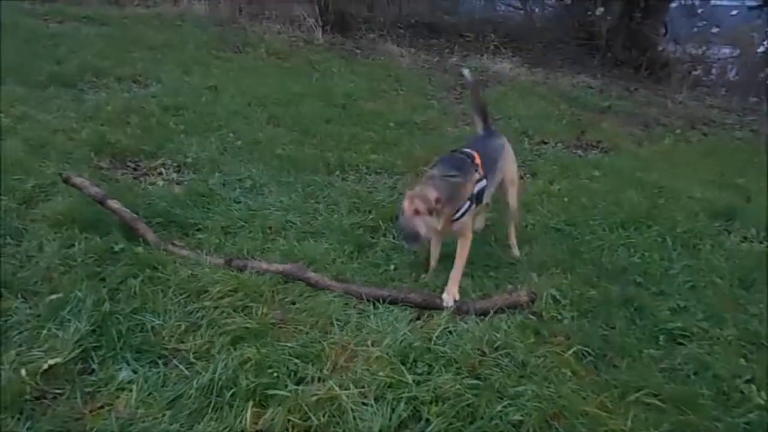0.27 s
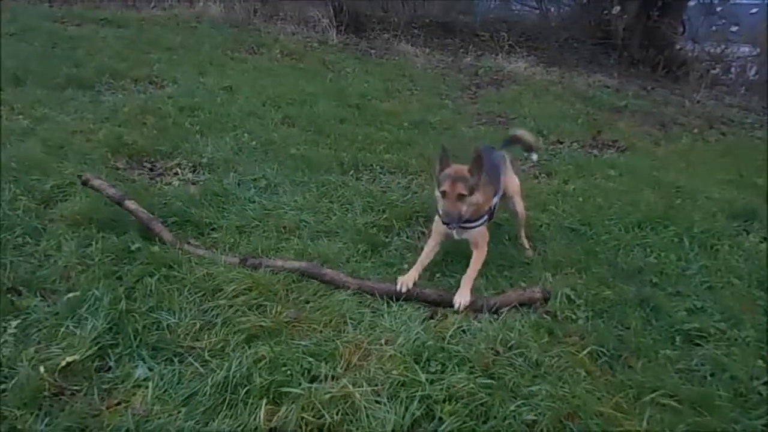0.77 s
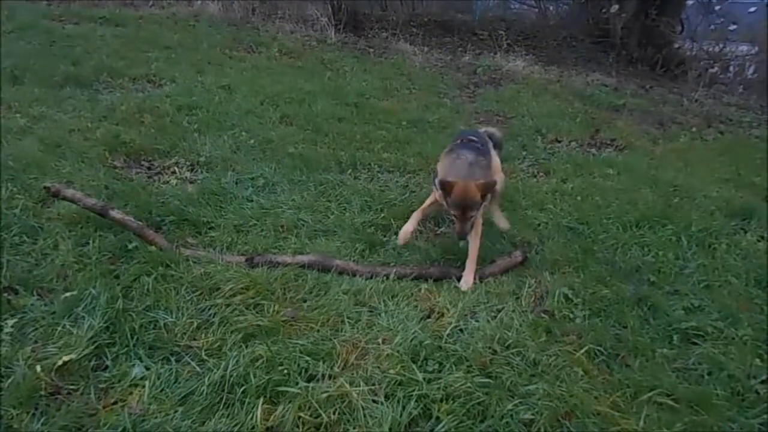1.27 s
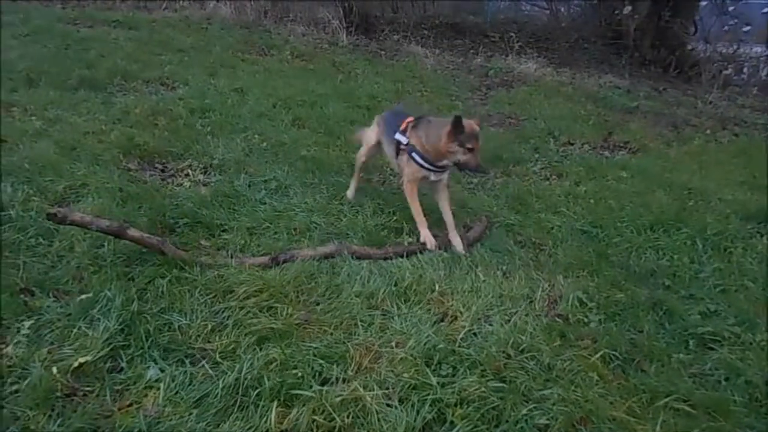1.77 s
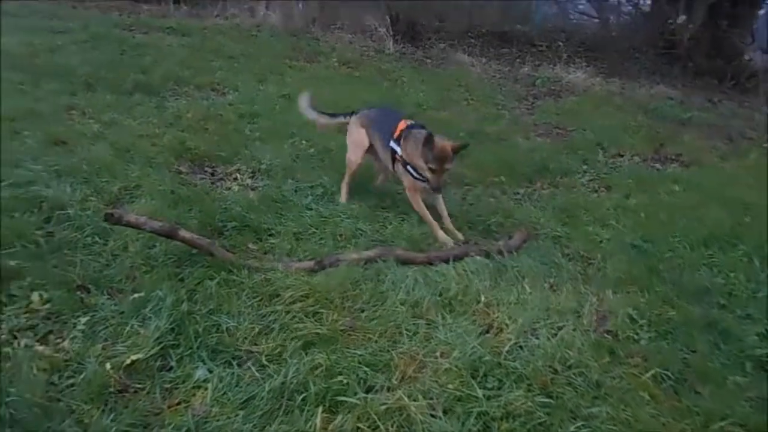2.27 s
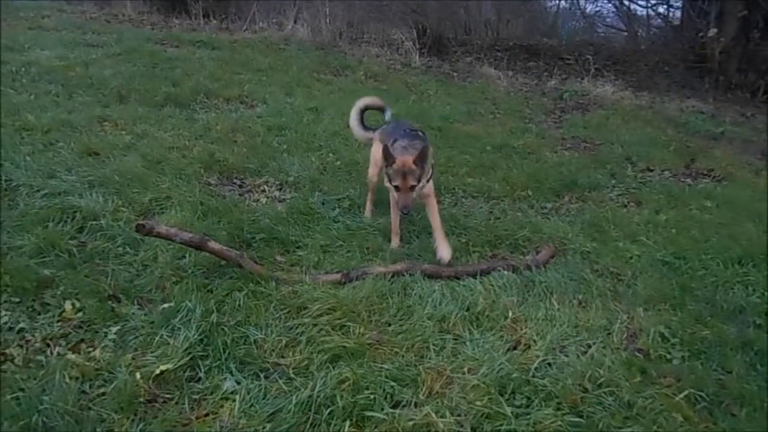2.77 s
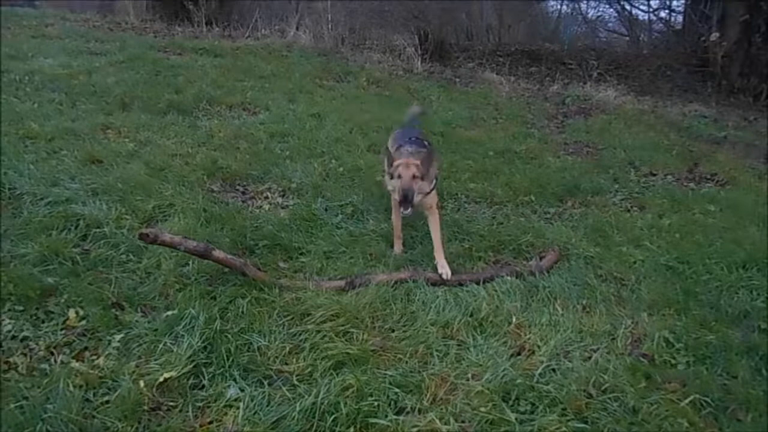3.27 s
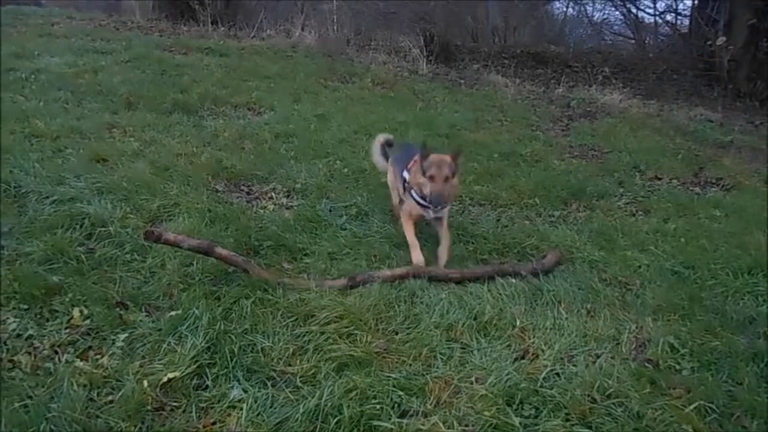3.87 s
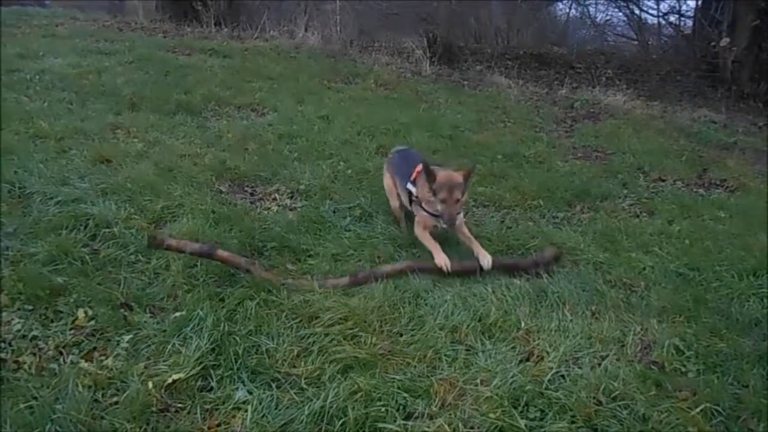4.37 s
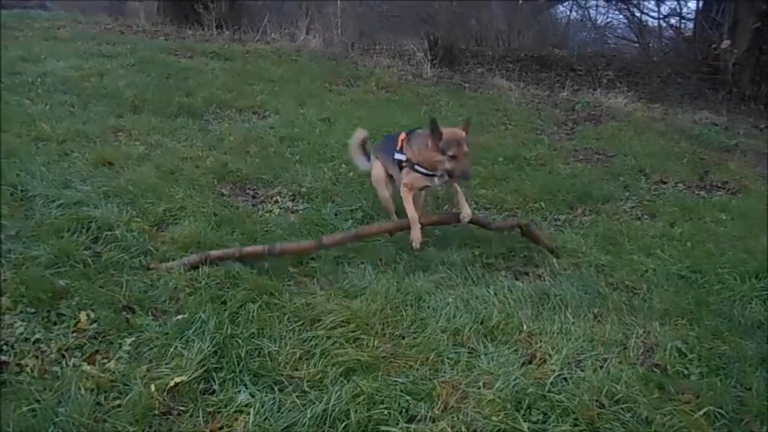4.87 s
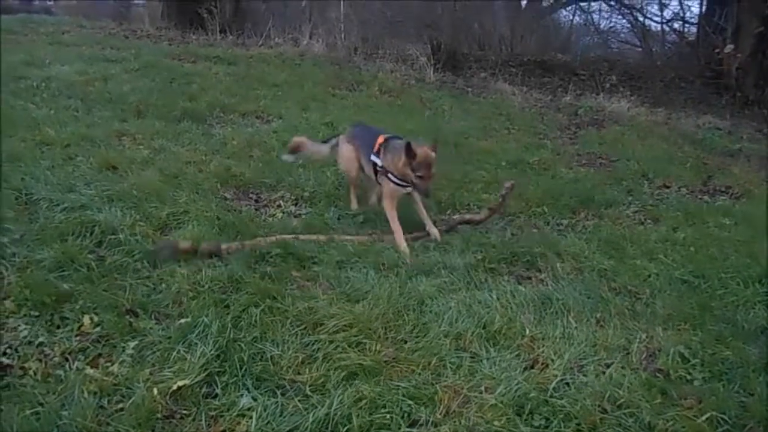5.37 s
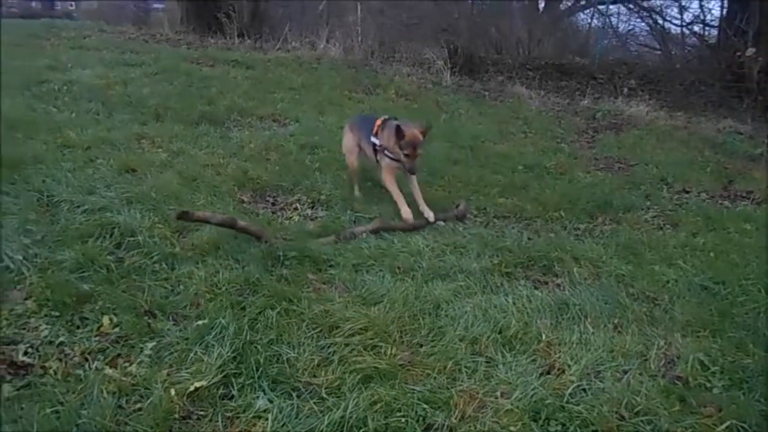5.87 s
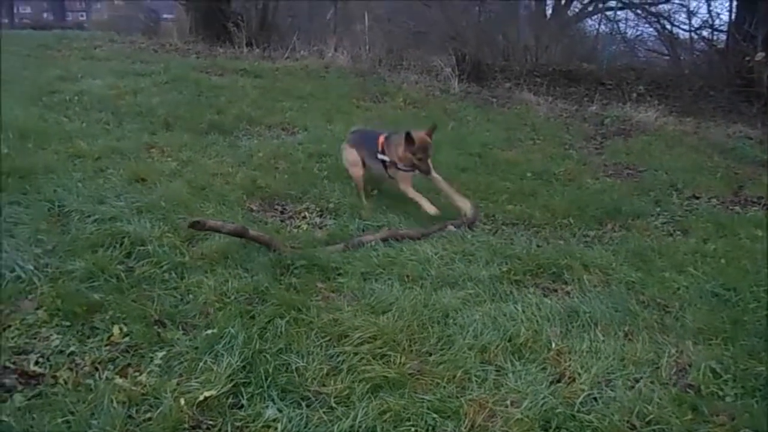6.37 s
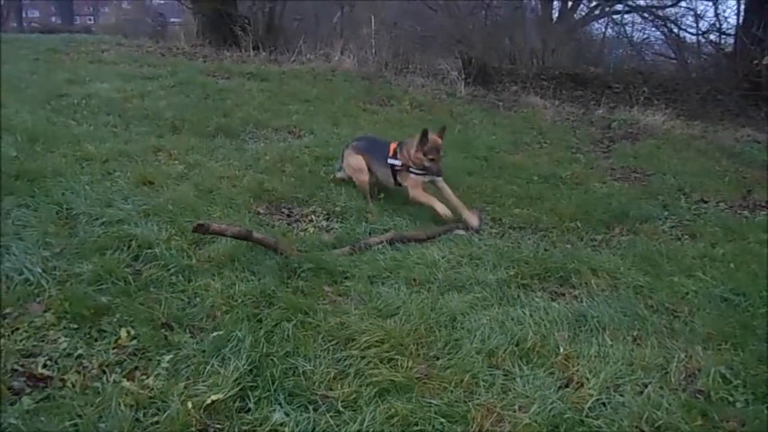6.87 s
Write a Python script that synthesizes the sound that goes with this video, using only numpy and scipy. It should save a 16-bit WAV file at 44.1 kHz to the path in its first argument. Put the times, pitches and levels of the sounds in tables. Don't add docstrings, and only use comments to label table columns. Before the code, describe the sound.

On an open grassy slope, a dog barks in a steady excited run, short and sharp, with crunchy overload on the loud peaks. Faint returns from hedge and trees follow each bark. In the gaps it paws a stick: soft thuds, woody clicks, small snaps and rustling grass, with heavier thumps later on. Far traffic hiss and brief low wind rumbles sit quietly beneath, caught by a small handheld camera.

```python
import sys
import numpy as np
from scipy import signal
from scipy.io import wavfile
from scipy.ndimage import uniform_filter1d

SR = 44100
rng = np.random.default_rng(int(sys.argv[2]) if len(sys.argv) > 2 else 0)


def amplitude_ratio(level_db):
    exponent = np.asarray(level_db, float) / 20
    return 10 ** exponent


def master_out(mix):
    frames = np.transpose(np.atleast_2d(mix))
    ceiling = np.clip(frames, -1, 1)
    pcm = np.round(ceiling * 32767).astype(np.int16)
    wavfile.write(sys.argv[1], SR, pcm)


N = 313992

# start, then lengths of swell, hoarse stage, clear stage and fade, all in [s].
BARKS = [(.182, .01, .037, .077, .025), (.788, .015, .049, .066, .032), (1.328, .022, .033, .059, .053),
         (1.795, .057, .058, .037, .048), (2.396, .025, .047, .06, .024), (3.226, .038, .041, .08, .025),
         (3.868, .037, .06, .045, .03), (4.386, .041, .031, .057, .04), (5.016, .047, .072, .023, .047),
         (5.617, .031, .034, .052, .05), (6.082, .036, .032, .045, .04), (6.612, .042, .048, .038, .045)]


def evened(x):
    return x / np.sqrt(np.mean(x ** 2) + 1e-20)


def read(points, hz):
    f, value = np.transpose(points)
    return np.interp(np.log(hz + 1), np.log(f + 1), value)


def add(mix, start_s, sound):
    part = mix[round(start_s * SR):][:len(sound)]
    part += sound[:len(part)]


def resonate(x, hz, width_hz):
    turn = np.exp(2j * np.pi * np.cumsum(hz * np.ones(len(x))) / SR)
    r = np.exp(-np.pi * width_hz / SR)
    return 2 * (turn * signal.lfilter([1 - r], [1, -r], x / turn)).real


def swells(events, rest_db):
    t = np.arange(N) / SR
    return amplitude_ratio(rest_db) + sum(amplitude_ratio(db) * np.exp(-((t - s) / half_s) ** 2) for s, half_s, db in events)


def traffic():
    # frequency [Hz], density [dB per Hz].
    road = [(20, -14.5), (60, -12.5), (369, -11.5), (880, -4.5), (1900, -7.5), (2880, -18), (8380, -36.5),
            (11000, -62.5)]
    level_db, patch_db = -46, 0.76
    frames, hz = N // 256 + 5, np.fft.rfftfreq(1024, 1 / SR)
    a, b, patches = rng.standard_normal((frames, 513, 3)).T
    patches = uniform_filter1d(patches, 12, 0)
    patches = evened(uniform_filter1d(patches, 16, 1))
    z = (a + 1j * b) * amplitude_ratio(read(road, hz)[:, None] + patch_db * patches)
    hiss = signal.istft(z, nperseg=1024, noverlap=768)[1][:N]
    return amplitude_ratio(level_db) * evened(hiss)


def wind():
    # middle [s], half length [s], level [dB].
    gusts = [(.01, 0.035, -38.5), (.16, .04, -52), (.76, .05, -51), (1.2, .15, -50.5), (1.73, .07, -45),
             (2.2, 0.088, -44), (3.1, 0.17, -61), (3.82, .1, -53), (4.97, 0.063, -47), (5.37, 0.084, -36.5),
             (6.05, 0.082, -45.5), (6.55, .12, -39), (6.96, 0.053, -31.5)]
    calm_db, buffet_db, buffet_s = -66.5, -44, 0.046
    lumps = amplitude_ratio(5.0 * evened(uniform_filter1d(rng.standard_normal(N), 1500)))
    band = signal.butter(2, [22, 110], "band", fs=SR, output="sos")
    low = signal.sosfilt(band, rng.standard_normal(N))
    buffets = [(sum(b), buffet_s, buffet_db) for b in BARKS]
    return swells(gusts + buffets, calm_db) * evened(low * lumps)


def knocks(events, cycles, noisy, t60_s, spread):
    out, t = np.zeros(N), np.arange(3000) / SR
    for (s, db, hz), puff in zip(events, rng.standard_normal((len(events), 3000))):
        swing = np.sin(2 * np.pi * hz * t) * np.exp(-hz * t / cycles)
        puff = resonate(puff, hz, spread * hz)
        puff = evened(resonate(puff, hz, spread * hz)) * amplitude_ratio(-60 * t / t60_s)
        onset = (1 - np.exp(-hz * t / 0.14)) ** 2
        add(out, s, amplitude_ratio(db) * (swing + noisy * puff) * onset)
    return out


def pawing():
    # time [s], peak [dB], pitch [Hz].
    thuds = [(0.017, -38, 216), (1.119, -44, 227), (1.227, -35, 144), (1.706, -35, 144), (1.749, -36, 143),
             (2.199, -43, 388), (2.998, -52, 452), (4.959, -33, 230), (5.315, -25.5, 143.7),
             (5.325, -28, 260), (5.347, -40, 289), (5.372, -22, 232), (5.388, -48, 307), (5.479, -39, 277),
             (5.896, -36.5, 218), (6.42, -35, 236), (6.455, -25.5, 168.6), (6.519, -27.5, 156),
             (6.573, -28, 250), (6.59, -26, 142), (6.94, -14.5, 171), (6.96, -28, 439), (6.979, -47.5, 186)]
    # time [s], peak [dB], pitch [Hz].
    ticks = [(0.5694, -51, 2800), (0.7257, -36, 3860), (1.272, -36, 3750), (1.6467, -37, 3650),
             (1.708, -32, 5170), (2.0453, -28, 3640), (2.2194, -55.5, 4410), (2.826, -40, 3600),
             (3.7192, -33, 3050), (3.8546, -19.5, 3800), (3.8734, -11.5, 4200), (4.1794, -46, 3880),
             (4.812, -42, 4390), (4.9611, -32, 4400), (5.4233, -46, 2710), (5.4794, -38, 7530),
             (6.4732, -29.5, 3300), (6.5904, -42, 4560)]
    # time [s], peak [dB], pitch [Hz].
    tag = [
        (6.254, -28, 3850),
    ]
    # time [s], peak [dB], pitch [Hz].
    snaps = [
        (1.272, -25, 1670),
        (1.536, -27, 900),
        (4.961, -43, 1780),
        (5.325, -30.5, 905),
        (5.424, -27, 714),
        (6.943, -41, 590),
    ]
    turf = knocks(thuds, cycles=1.0, noisy=0.68, t60_s=0.088, spread=1.07)
    turf = turf + knocks(ticks, cycles=1.5, noisy=.45, t60_s=.03, spread=.9)
    turf = turf + knocks(tag, cycles=19.0, noisy=0.07, t60_s=0.033, spread=.2)
    return turf + knocks(snaps, cycles=2.0, noisy=0.96, t60_s=0.031, spread=1.0)


def rustle():
    # middle [s], half length [s], level [dB].
    scuffs = [(.15, .05, -59), (.572, 0.013, -56), (.72, .1, -57), (1.27, .08, -55), (1.74, .08, -55.5),
              (2.045, 0.019, -57), (2.21, 0.015, -53), (2.35, 0.11, -57), (2.63, 0.023, -58),
              (3.0, 0.24, -67), (3.54, .015, -56), (3.76, 0.13, -48), (4.12, .015, -63), (4.33, .09, -55.5),
              (4.81, 0.013, -46), (4.9, 0.15, -59), (5.45, 0.082, -52.5), (5.59, 0.045, -51),
              (6.02, 0.099, -56.5), (6.475, .015, -50.5), (6.58, 0.062, -62.5), (6.97, .02, -64)]
    rest_db, after_db, after_s = -75.5, -48.5, .05
    snaps_per_s = 9000
    tufts = amplitude_ratio(1.5 * evened(uniform_filter1d(rng.standard_normal(N), 1500)))
    snaps = amplitude_ratio(2.0 * rng.exponential(1, N)) * rng.standard_normal(N)
    snaps = snaps * (rng.random(N) < snaps_per_s / SR)
    band = signal.butter(2, [2200, 6500], "band", fs=SR, output="sos")
    fizz = signal.sosfilt(band, snaps * tufts)
    after_barks = [(sum(b), after_s, after_db) for b in BARKS]
    return swells(scuffs + after_barks, rest_db) * evened(fizz)


def controls(stages, voice, mouth):
    peak_db, high, locked, last, clear = voice
    jaw, jaw_clear, mouth_db, clear_db = mouth
    start_db, murmur_db, voiced_db, open_db = -44, -24.5, -13.5, -9
    release_db, midfade_db, drop_db, end_db = -7, -10, -21, -33
    murmur, hold, midfade = .52, .75, .36
    catch_s, push_s, lock_s, drop_s = 0.0031, .007, .012, .008
    push_db, hold_sag_db = -4, -2.5
    open_sag, midfade_sag, fade_sag, jaw_shut = .93, 0.96, .8, 0.75
    hoarse, hoarse_fade = .5, .3
    start, opened, lock, release, end = np.cumsum(stages)
    catch = start + murmur * (opened - start)
    held = lock + hold * (release - lock)
    linger = release + midfade * (end - release)
    return [(start, start_db, high, hoarse, jaw, mouth_db),
            (catch - catch_s, murmur_db, high, hoarse, jaw, mouth_db),
            (catch, voiced_db, high, hoarse, jaw, mouth_db),
            (opened, open_db, high, hoarse, jaw, mouth_db),
            (opened + push_s, peak_db + push_db, high, hoarse, jaw, mouth_db),
            (lock - lock_s, peak_db, open_sag * high, hoarse, jaw, mouth_db),
            (lock, peak_db, locked, clear, jaw_clear, clear_db),
            (held, peak_db + hold_sag_db, locked + hold * (last - locked), clear, jaw_clear, clear_db),
            (release, release_db, last, clear, jaw_clear, clear_db),
            (linger, midfade_db, midfade_sag * last, clear, jaw_clear, clear_db),
            (linger + drop_s, drop_db, midfade_sag ** 2 * last, hoarse_fade, jaw_clear, clear_db),
            (end, end_db, fade_sag * last, hoarse_fade, jaw_shut * jaw_clear, clear_db)]


def bark(rows):
    # frequency [Hz], width [Hz], level [dB].
    throat = [(900, 380, 0), (1760, 420, 0), (500, 400, -21), (1320, 400, -18), (2250, 400, -14),
              (3900, 1600, -21)]
    bark_db = 8.5
    s, *columns = np.transpose(rows)
    t = np.arange(s[0], s[-1], 1 / SR)
    effort_db, hz, hoarse, jaw, mouth_db = (np.interp(t, s, c) for c in columns)
    hoarse = np.clip(hoarse, 0, 1)
    stumble, sway, air = rng.standard_normal((12000, 3))[:len(t)].T
    stumble = evened(uniform_filter1d(stumble, 120))
    turns = np.cumsum(hz * (1 + .2 * hoarse * stumble)) / SR
    air = evened((.3 + np.exp(-(turns % 1) / .3)) * air)
    shift = [jaw, 1, 1, 1, 1, 1]
    lift_db = [0, mouth_db, 0, 0, mouth_db / 2, 0.8 * effort_db]
    k = np.arange(1, 13)[:, None]
    folds, breath = 0, 0
    for (f, width, db), by, up in zip(throat, shift, lift_db):
        gain = amplitude_ratio(db + up)
        folds = folds + gain / (1 + (2 * (k * hz - f * by) / width) ** 2) ** 2
        breath = breath + gain * resonate(resonate(air, f * by, width), f * by, width)
    folds = .43 * (folds * np.sin(2 * np.pi * k * turns - .45)).sum(0)
    folds = folds * amplitude_ratio(3.0 * hoarse * evened(uniform_filter1d(sway, 150)))
    soft_walls = signal.butter(6, 2450, fs=SR, output="sos")
    breath = signal.sosfilt(soft_walls, breath)
    voice = (1 - hoarse) * folds + 1.3 * hoarse * breath
    steady = voice / np.sqrt(uniform_filter1d(voice ** 2, 300) + 1e-9)
    return s[0], amplitude_ratio(effort_db + bark_db) * steady * signal.windows.tukey(len(t), .05)


def barking():
    # peak effort [dB], opening, locked and release pitch [Hz],
    # hoarseness when locked [0-1].
    voices = [(4, 585, 435, 480, 0.2), (4.5, 505, 437, 438, 0.04), (1, 570, 432, 420, .08),
              (0.5, 535, 445, 446, .15), (2, 520, 442, 444, .05), (3, 505, 432, 510, 0.3),
              (3, 515, 434, 440, .05), (0.5, 565, 450, 424, .05), (-1, 560, 430, 412, .15),
              (3, 500, 446, 445, .05), (0, 545, 470, 445, .4), (-2.5, 578, 445, 410, .1)]
    # jaw factor on the first resonance hoarse, then clear [ratio],
    # mouth resonance hoarse, then clear [dB].
    mouths = [(.7, 1.01, 0.75, -1), (1.1, 1.01, -4, -2.5), (1.12, 1.01, -1, -3), (1.1, 1.01, -2, 0.6),
              (1.08, 1.01, -4, -1.26), (1.1, 1.01, -4, -1.03), (1.1, 1.01, -4.5, 0.67),
              (1.2, 1.05, -3.5, 0.7), (.72, 1.01, -2, -4), (.95, 1.07, 3, -3), (1.1, 1.05, -7.5, -3),
              (.95, 1.25, 2.5, -1.4)]
    dog = np.zeros(N)
    for row in zip(BARKS, voices, mouths):
        add(dog, *bark(controls(*row)))
    return dog


def echoes(x):
    # frequency [Hz], t60 [s].
    trees = [(300, 0.45), (480, 1.7), (900, 1.1), (1800, 1), (2600, 0.35), (4500, 0.35)]
    # delay [s], level [dB].
    slaps = [
        (0.061, 13.5),
        (0.109, 9),
        (0.191, -24.5),
        (.26, -39),
        (0.331, -8),
    ]
    # frequency [Hz], gain [dB].
    colour = [(250, -6.5), (450, 5), (900, -5), (1400, 2.5), (1800, -5), (2400, 6), (4000, 2), (7000, 1)]
    echo_db, wash_db, wash_t60_s = -40.5, 11.0, 0.073
    taps = np.zeros(SR)
    at = np.arange(700, SR - 150, 150)
    place, size, sign = rng.random((len(at), 3)).T
    taps[at + (150 * place).astype(int)] = np.sign(sign - .5) * size ** -.3
    hz, t, z = signal.stft(taps, SR, nperseg=256)
    fade = amplitude_ratio(-60 * t / read(trees, hz)[:, None]) + amplitude_ratio(wash_db - 60 * t / wash_t60_s)
    tail = signal.istft(z * fade, SR, nperseg=256)[1]
    tail = tail / np.linalg.norm(tail)
    for s, db in slaps:
        add(tail, s, amplitude_ratio(db - 12.5) * signal.windows.hann(12) / 3)
    hz, t, z = signal.stft(signal.fftconvolve(x, tail)[:N], SR, nperseg=512)
    a, b = rng.standard_normal(z.shape[::-1] + (2,)).T
    sway = .5 * evened(uniform_filter1d(a, 3, 1)) + .5j * evened(uniform_filter1d(b, 3, 1))
    z = z * amplitude_ratio(read(colour, hz))[:, None] * (1 + sway)
    return amplitude_ratio(echo_db) * signal.istft(z, nperseg=512)[1][:N]


def scene():
    dog = barking()
    return (dog + echoes(dog) + traffic() + rustle() + wind() + pawing())[None]


def low_pass(x):
    return signal.sosfilt(signal.butter(12, 15800, fs=SR, output="sos"), x)


def record(dry):
    recovery_db_per_s, threshold_db, full_scale = 60., -27.5, .9
    power_db = 10 * np.log10(abs(uniform_filter1d(dry[0] ** 2, 400)) + 1e-12)
    fall_db = np.arange(N) * recovery_db_per_s / SR
    over_db = np.maximum.accumulate(power_db + fall_db) - fall_db - threshold_db
    duck_db = np.clip(.35 * uniform_filter1d(over_db, 200), 0, 9)
    ducked = dry[0] / amplitude_ratio(duck_db)
    flat = ducked / (1 + (ducked / 1.18) ** 4) ** .25
    drooped = signal.lfilter(*signal.butter(1, 120, "high", fs=SR), flat)
    half = signal.resample_poly(drooped, up=1, down=2)[:N // 2]
    wrapped = (half + full_scale) % (2 * full_scale) - full_scale
    spread = np.zeros(N)
    spread[1::2] = 2 * wrapped
    lowpass = signal.firwin(101, 10700, window=("kaiser", 8), fs=SR)
    smooth = signal.oaconvolve(spread, lowpass, "same")
    topped = np.clip(smooth, -.91, .91)
    return low_pass(topped[None])


dry = scene()
out = record(dry)
master_out(out)
```